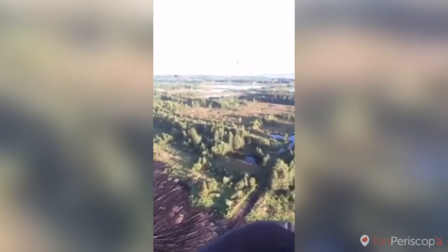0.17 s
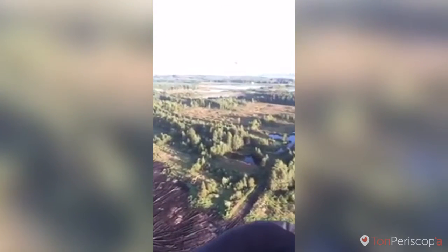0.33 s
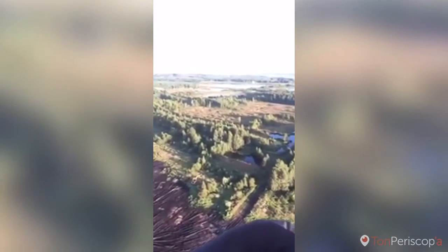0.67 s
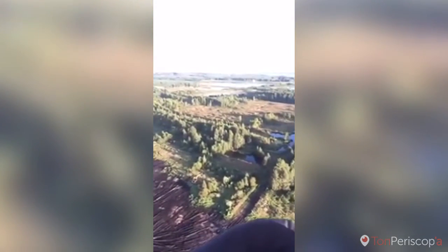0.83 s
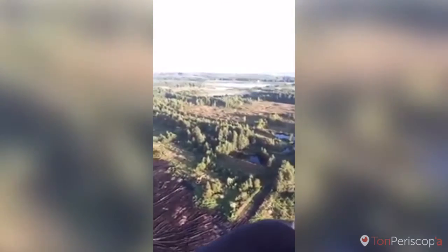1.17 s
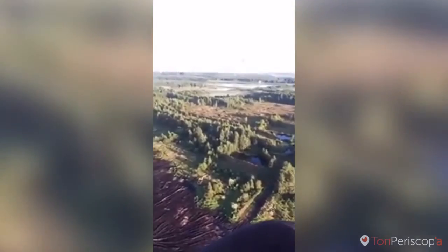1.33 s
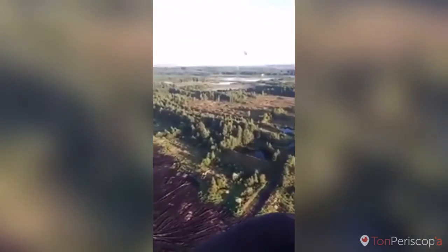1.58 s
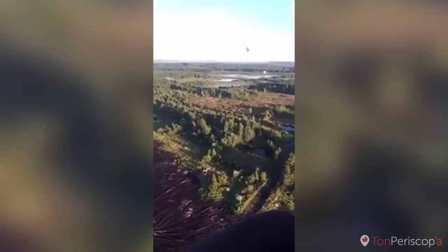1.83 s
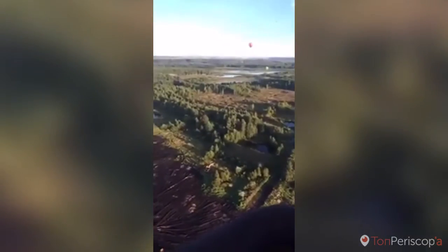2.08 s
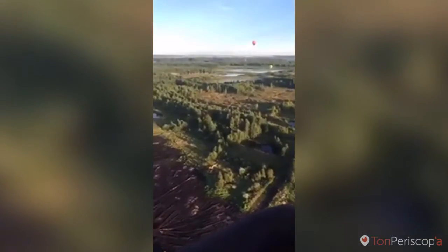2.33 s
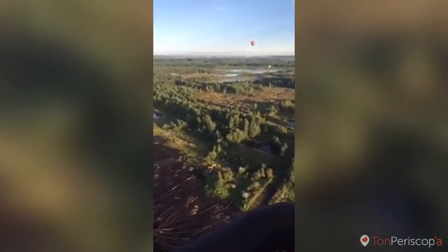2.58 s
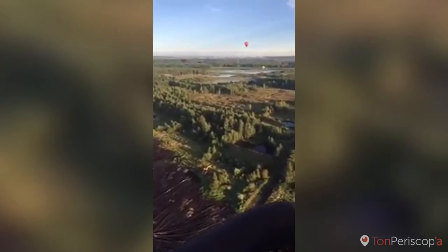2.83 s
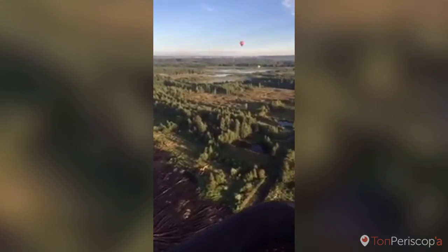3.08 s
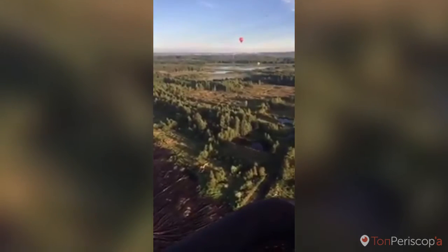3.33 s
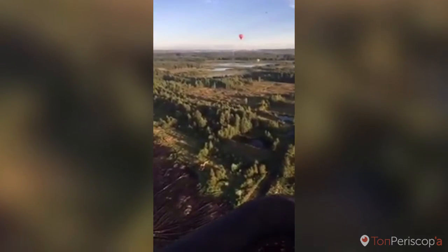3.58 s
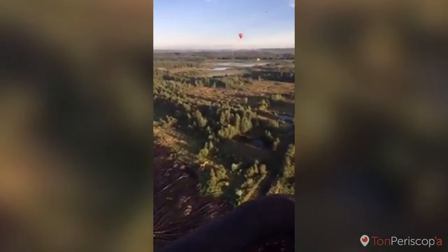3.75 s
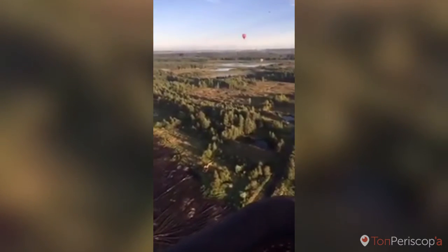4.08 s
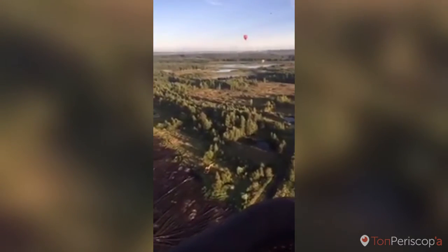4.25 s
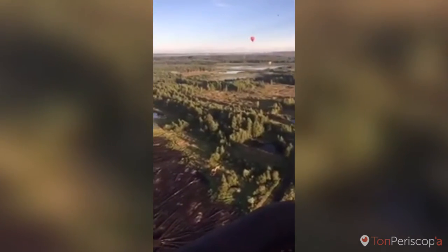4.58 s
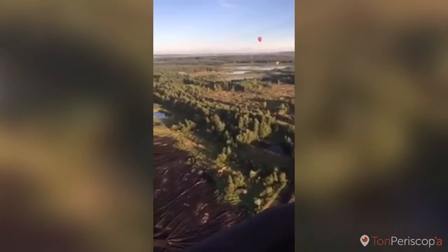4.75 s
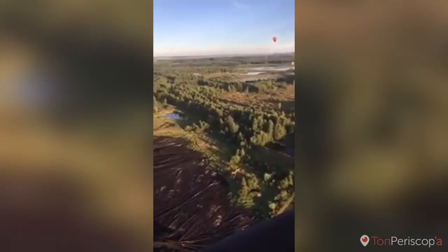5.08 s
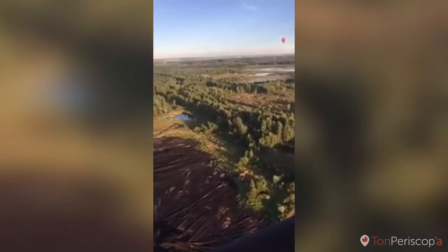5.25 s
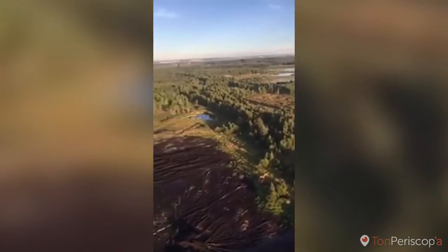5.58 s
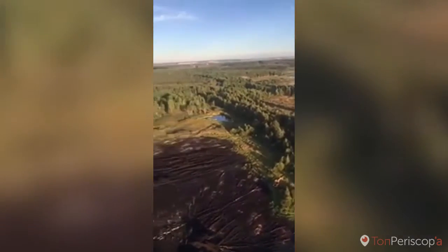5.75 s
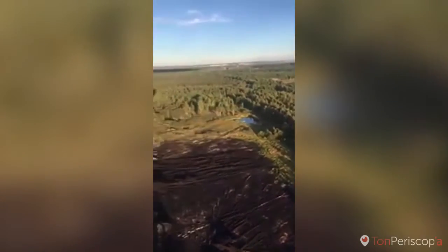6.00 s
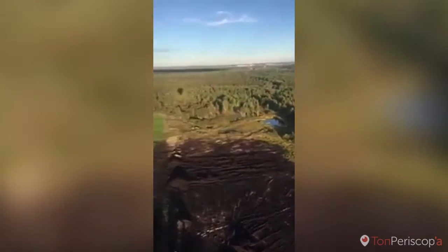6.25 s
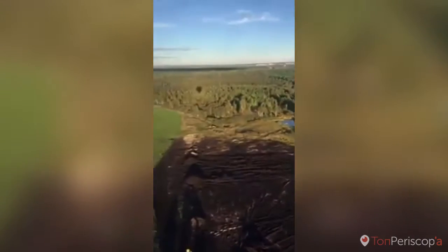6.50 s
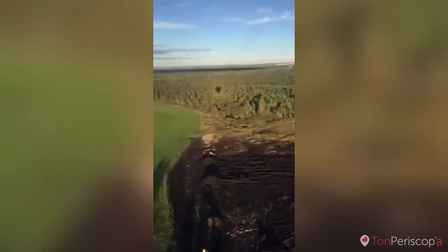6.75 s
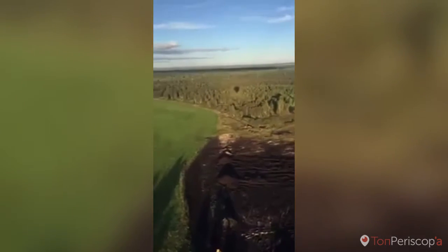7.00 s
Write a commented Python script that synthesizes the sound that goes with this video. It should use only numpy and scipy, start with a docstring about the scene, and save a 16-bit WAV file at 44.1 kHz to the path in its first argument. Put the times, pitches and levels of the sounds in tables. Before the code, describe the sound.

For the first five and a half seconds, a hot-air balloon's pilot flame rumbles softly and spits several times a second, in thin, irregular, fizzy ticks with a slight metallic colour. At about 0.4 seconds, fingers scuff the microphone and a metal fitting clacks with a short ring. A hand bumps the microphone with a dull thud at 1.4 seconds. At 5.5 seconds the gas burner lights with a sudden low whump and becomes far louder than anything before: a bright jet hiss over a throbbing, crackling roar and deep rumble. The blast eases after 6 seconds and dies away around 6.5 to 6.7. At about 6.8 seconds the burner opens again and roars to the end, just after 7 seconds. Everything is heard within arm's reach from the basket, in still open air.

```python
"""A hot-air balloon's propane burner lights with a whump, roars, dies away and is opened again.
Its turbulent jet hisses and its unsteady flame rumbles; both follow the flow through the valve and fade
as the line empties. Before it lights, the pilot flame rumbles softly and spits as drops flash to gas,
a metal fitting clacks and a hand bumps the microphone. All is heard from the basket, in still air."""
import sys
import numpy as np
from scipy import signal
from scipy.fft import rfft, irfft
from scipy.io import wavfile
from scipy.ndimage import uniform_filter1d

SR = 44100
rng = np.random.default_rng(int(sys.argv[2]) if len(sys.argv) > 2 else 0)


def generate_wav(sig):
    """Save sig (samples, or channels by samples) to the path in sys.argv[1] as 16-bit PCM at SR."""
    pcm = np.round(np.clip(np.atleast_2d(sig).T, -1, 1) * 32767).astype(np.int16)
    wavfile.write(sys.argv[1], SR, pcm)


N = 314854


def from_db(db):
    """Amplitude ratio of a level in decibels."""
    return 10 ** (np.asarray(db) / 20)


def rms_one(x):
    """Normalisation to unit power."""
    return x / np.sqrt(np.mean(x ** 2) + 1e-20)


def seconds():
    """The time of every sample."""
    return np.arange(N) / SR


def reflections(echo_db, count=30):
    """Interference: echoes between can, coil and frame carve a fine ripple into the spectrum."""
    paths = np.zeros(N)
    echoes = from_db(echo_db) * rng.choice([-1, 1], count) / np.sqrt(count)
    delays_s = rng.uniform(.002, .022, count)
    paths[(delays_s * SR).astype(int)] = echoes
    paths[0] = 1
    return rfft(paths)


def noise(spectrum, resonances=(), echo_db=-60):
    """Source and filter: broadband noise shaped by a spectrum, resonances and echoes; unit power."""
    hz = np.maximum(np.arange(N // 2 + 1) * SR / N, 1)
    knots, levels = np.transpose(spectrum)
    octaves_outside = np.abs(np.log2(hz / np.clip(hz, knots[0], knots[-1])))
    db = np.interp(np.log(hz), np.log(knots), levels) - 30 * octaves_outside
    for centre, width, lift in resonances:
        db = db + lift / (1 + (2 * (hz - centre) / width) ** 2)
    return rms_one(irfft(rfft(rng.standard_normal(N)) * from_db(db) * reflections(echo_db), N))


def flutter(rate_hz, spread):
    """Random modulation of unit power around one rate; spread is its width in log frequency."""
    hz = np.maximum(np.arange(N // 2 + 1) * SR / N, .01)
    band = np.exp(-(np.log(hz / rate_hz) / spread) ** 2)
    return rms_one(irfft(rfft(rng.standard_normal(N)) * band, N))


def evened(x, window_s):
    """Division by the running rms steadies the slow level of a noise and keeps its fast grain."""
    return x / np.sqrt(uniform_filter1d(x ** 2, int(window_s * SR)) + 1e-9)


def puffs(rows, rise_s):
    """Envelope of linear rise and exponential decay for bursts (time [s], level [dB], t60 [s])."""
    out = np.zeros(N)
    for start, db, t60 in rows:
        first = max(int(start * SR), 0)
        age = np.arange(min(int((rise_s + t60) * SR), N - first)) / SR
        decay_db = 60 * np.maximum(age - rise_s, 0) / t60
        out[first:first + len(age)] += np.minimum(age / rise_s, 1) * from_db(db - decay_db)
    return out


def struck(hits, modes):
    """Modal superposition: each impulse sets every mode ringing as a damped sinusoid."""
    impulses, out = np.zeros(N), np.zeros(N)
    for s, db in hits:
        impulses[int(s * SR)] = from_db(db)
    for k, (hz, mode_db, t60) in enumerate(modes):
        radius, angle = np.exp(-np.log(1000) / (t60 * SR)), 2 * np.pi * hz / SR
        feedback = [1, -2 * radius * np.cos(angle), radius ** 2]
        ring = signal.lfilter([0, np.sin(angle)], feedback, impulses + 1e-18)
        out += (-1) ** k * from_db(mode_db) * ring
    return out


def whistle(centre_hz=12300, width_hz=140, level_db=-24, swell_db=4):
    """Narrowband noise: the pilot's orifice sings a faint breathy note that comes and goes."""
    peak = signal.iirpeak(centre_hz, centre_hz / width_hz, fs=SR)
    note = rms_one(signal.lfilter(*peak, signal.lfilter(*peak, rng.standard_normal(N))))
    return from_db(level_db + swell_db * flutter(0.98, spread=0.66)) * note


VALVE_OPEN_S = 5.496  # the burner lights; from here the pilot's hiss is quieter and no sputter starts
# spectra of the pilot's flame and of its gas hiss: (frequency [Hz], relative level [dB])
PILOT_RUMBLE = [(15, -58), (25, -57), (41, -12), (65, -0.5), (134, -3.5), (156, -6.5), (216, -7),
                (303, -20), (343, -19), (500, -37.5), (650, -43), (1100, -120)]
PILOT_HISS = [(300, -8), (450, -1), (560, -1), (720, 4), (850, 1), (1020, 6.5), (1350, -5.5), (1880, 1),
              (2500, -10), (5800, -12.5), (7600, -24), (9100, -8), (10800, -24.5), (12400, -14),
              (15000, -23)]
# size of the pilot flame, heard in its rumble: (time [s], relative level [dB])
PILOT_SIZE = [(0.0, -48), (0.33, -51.5), (0.63, -53), (1.8, -57), (2.78, -52), (4.35, -56), (4.72, -53),
              (5.17, -54.5), (5.4, -55.5)]


def pilot_flame(tube, rumble_db=2.0, hiss_db=-62.5, flicker_db=1.8, waver_db=0.55, hiss_drop_db=-5.0):
    """Combustion noise: a small flame flickers; its thin hiss is heard quieter once the burner lights."""
    size_db = np.interp(seconds(), *np.transpose(PILOT_SIZE))
    waver = waver_db * flutter(14, spread=0.95)
    hiss_gain = from_db(hiss_db + waver + hiss_drop_db * (seconds() > VALVE_OPEN_S))
    rumble_gain = from_db(size_db + rumble_db + flicker_db * flutter(12.3, spread=0.67))
    rumble = rumble_gain * noise(PILOT_RUMBLE)
    return rumble + hiss_gain * (noise(PILOT_HISS, tube, echo_db=-9) + whistle())


def sputters(per_s=3.4, level_db=-47, spread_db=3, t60=0.23, count=40):
    """Jittered pulse train: envelope of the smallest drops, which come until the burner lights."""
    jitter, strength = rng.uniform(-0.83, 1, (count, 2)).T
    starts = (np.arange(count) + .5 + .5 * jitter) / per_s
    levels = level_db + spread_db * strength
    return puffs([(s, db, t60) for s, db in zip(starts, levels) if s < VALVE_OPEN_S], rise_s=0.0088)


# spits of the pilot jet: (time [s], relative level [dB], t60 of the middle band [s], dull share [dB])
SPITS = [(0.0064, -43, 0.16, -5), (0.1034, -44.5, 0.11, -8.5), (0.178, -46.5, 0.17, -8),
         (0.2239, -42, 0.1, -16), (0.2695, -46, 0.43, -6), (0.5377, -42.5, 0.09, -7),
         (0.6779, -39, 0.096, -18), (0.757, -38.5, 0.11, -10), (0.827, -37.5, 0.12, -9),
         (0.933, -43, 0.091, -8.5), (0.9766, -39, 0.092, -13), (1.002, -40.5, 0.15, -8.5),
         (1.076, -40.5, 0.27, -10), (1.2087, -38.5, 0.1, -17), (1.289, -44, 0.19, -12),
         (1.4128, -38.5, 0.16, -7.5), (1.493, -49, 0.12, -3), (1.5564, -38.5, 0.12, -13),
         (1.6858, -39.5, 0.23, -11.5), (1.8157, -39.5, 0.14, -18), (1.9576, -32.5, 0.14, -14),
         (2.1066, -41, 0.2, -9.5), (2.2534, -39, 0.14, -13), (2.4117, -40.5, 0.16, -9),
         (2.486, -51, 0.15, -12), (2.5177, -46.5, 0.3, -17), (2.6444, -41.5, 0.15, -15),
         (2.6833, -39, 0.15, -14), (2.7887, -43.5, 0.13, -11), (2.854, -46.5, 0.11, -6),
         (2.9038, -39, 0.21, -11.5), (3.035, -41, 0.1, -15), (3.155, -41, 0.11, -16),
         (3.1754, -39.5, 0.11, -9.5), (3.2755, -40, 0.16, -11), (3.3844, -45.5, 0.33, -10),
         (3.4936, -42.5, 0.11, -12), (3.6002, -44.5, 0.15, -17), (3.7363, -38, 0.19, -11),
         (3.86, -41.5, 0.082, -17), (4.0502, -36, 0.14, -12.5), (4.1405, -45, 0.11, -13),
         (4.3006, -40, 0.092, -15), (4.4098, -42, 0.19, -11.5), (4.5974, -40.5, 0.094, -17),
         (4.6576, -47, 0.16, -14), (4.7381, -41.5, 0.13, -22), (4.906, -39.5, 0.17, -17),
         (5.0454, -42.5, 0.077, -25), (5.111, -47, 0.12, -6), (5.1916, -42, 0.15, -17.5),
         (5.3273, -44, 0.2, -9), (5.441, -47, 0.43, -15)]
# spectra of a spit's three bands: (frequency [Hz], relative level [dB])
SPIT_DULL = [(1200, -13), (1650, -2), (2000, -0.5), (2400, -4), (2700, -1.5), (3100, -0.5), (3600, -3.5),
             (4300, -6), (5500, -35)]
SPIT_MIDDLE = [(3200, -25), (4200, -7.5), (5000, -5), (5700, 2), (6700, 0.5), (7400, -5), (8000, -16),
               (9500, -54)]
SPIT_TOP = [(6800, -15), (8200, -2), (9400, 2), (10500, -1), (11500, -5), (13000, -5), (15000, -10.5)]


def pilot_spits(tube, lead_s=0.0048, usual_db=-41, top_growth=0.072, fizz_db=1.64):
    """Flash evaporation: propane drops burst into gas; the dull band swells later and lingers."""
    s, db, t60, dull_share_db = np.transpose(SPITS)
    onset = s - lead_s
    weak = sputters()
    brighter_db = top_growth * (db - usual_db)  # a harder spit has more treble
    dull = puffs(zip(onset, db + dull_share_db - 6.5, t60 * 1.9), rise_s=0.01)
    middle = puffs(zip(onset, db - 13.5, t60), rise_s=0.0057)
    top = puffs(zip(onset, db - 13.5 + brighter_db, t60 * 0.78), rise_s=0.0078)
    bands = [(dull + from_db(-15.0) * weak) * noise(SPIT_DULL, tube, echo_db=4.0),
             (middle + from_db(-14.5) * weak) * noise(SPIT_MIDDLE, tube, echo_db=-2.5),
             (top + from_db(-21.0) * weak) * noise(SPIT_TOP, echo_db=1)]
    return sum(band * from_db(fizz_db * flutter(61, spread=1.3)) for band in bands)


# narrow resonances of the pilot's tube: (frequency [Hz], gain [dB])
TUBE_MODES = [(1690, 1.5), (1790, 8), (1920, 7), (2170, 11), (2380, 9.5), (2530, 7), (2990, 7), (3110, 6),
              (4220, 8), (4495, 9.5), (4800, 11.5), (5130, 8), (5400, 2), (5520, 8.5), (5800, 8.5),
              (6000, -7.5), (6330, 8.5), (6790, 7)]


def tube_ring(ring_db=-34.5, t60=0.11, scatter_db=3.5, max_delay_s=.012):
    """Modal excitation: each spit shakes the tube's modes in its own mix, so every tick has its colour."""
    s, db = np.transpose(SPITS)[:2]
    scatter = scatter_db * np.clip(rng.standard_normal((len(s), len(TUBE_MODES))), -2, 2)
    levels = db[:, None] + ring_db + scatter
    starts = s[:, None] + max_delay_s * rng.random(levels.shape)
    return sum(struck(zip(starts[:, k], levels[:, k]), [(hz, gain_db, t60)])
               for k, (hz, gain_db) in enumerate(TUBE_MODES))


# impact on the metal fitting: (time [s], level [dB])
CLACK = [(0.4222, -24)]
# modes of the fitting: (frequency [Hz], gain [dB], t60 [s])
FITTING_MODES = [(1300, -16, 0.064), (1980, -18, 0.35), (2120, 7.5, 0.016), (2290, 2.5, 0.025),
                 (2490, -21, 0.36), (3070, -6.5, 0.026), (3360, -3, 0.02), (3730, 3, 0.019),
                 (4400, -15, 0.089), (4791, -9, 0.1), (5400, -12, 0.088), (6770, -19, 0.046),
                 (8800, -8.5, 0.061), (10800, -33, .05)]


def fitting(crack_db=-14.0, crack_t60=0.076):
    """Impact of metal on metal: a broadband crack and the free vibration of the fitting."""
    s, db = CLACK[0]
    envelope = puffs([(s, db + crack_db, crack_t60)], rise_s=0.0023)
    crack = envelope * (noise(SPIT_MIDDLE, echo_db=-9) + noise(SPIT_TOP, echo_db=-11))
    return struck(CLACK, FITTING_MODES) + crack


# ringing of the frame after the clack and two spits: (time [s], level [dB], t60 [s])
FRAME_RINGS = [(0.4222, -37, 0.23), (1.960, -55, 0.23), (2.645, -42.5, 0.19)]
# spectrum of the frame's two clusters of modes: (frequency [Hz], relative level [dB])
FRAME_SPECTRUM = [(1300, -10), (1750, -3), (1950, -5), (2250, 2), (2600, -7), (3700, -10), (4400, -1),
                  (4750, -5), (5300, -15), (6500, -22)]


def frame(tube):
    """Modal overlap: many close modes of the burner frame blur into a short metallic tail."""
    return puffs(FRAME_RINGS, rise_s=0.0046) * noise(FRAME_SPECTRUM, tube)


# fingers rubbing the microphone's case: (time [s], level [dB], t60 [s])
RUBS = [(0.328, -39.5, 0.083), (0.345, -46, 0.14), (0.382, -42.5, 0.08), (0.408, -44.5, 0.12),
        (0.975, -52.5, 0.18), (1.002, -50.5, 0.055), (1.372, -48, .06), (1.382, -48, 0.037)]
# spectrum of the rubbing: (frequency [Hz], relative level [dB])
RUB_SPECTRUM = [(130, 6.5), (250, -4), (400, -3.5), (530, -13), (680, 3.5), (820, -13), (970, -2.5),
                (1200, -35), (1800, -35)]
# bump of the hand on the case: (time [s], level [dB])
BUMP = [(1.3932, -23.5)]
# damped modes of the case: (frequency [Hz], gain [dB], t60 [s])
CASE_MODES = [(140, -14, .03), (272, -22, 0.012), (400, 6.5, 0.0058), (595, 3, 0.0085), (880, -11, 0.012)]


def hand():
    """Structure-borne sound: friction and one bump on the microphone's case give dull scuffs and a thud."""
    return puffs(RUBS, rise_s=0.0025) * noise(RUB_SPECTRUM) + struck(BUMP, CASE_MODES)


# flares that run ahead of the fireball: (time [s], level [dB], t60 [s])
FLARES = [(5.478, -43, 0.25), (5.502, -13, 0.06)]


def flame_front():
    """Deflagration: gas catches at the pilot with a short broadband flare."""
    spectrum = [(150, 6.5), (300, -6), (520, -7), (750, -14.0), (2200, -28)]
    return puffs(FLARES, rise_s=0.013) * noise(spectrum)


def ignition(start_s=5.502, first_hz=182, last_hz=57, grow_s=0.0198, level_db=2.5, t60=0.056):
    """Monopole radiation: the fireball's pulsation slows as it grows, a whump of falling pitch."""
    age = np.maximum(seconds() - start_s, 0)
    hz = last_hz + (first_hz - last_hz) * np.exp(-(age / grow_s) ** 2)
    envelope = puffs([(start_s, level_db, t60)], rise_s=0.031)
    return envelope * np.sin(2 * np.pi * np.cumsum(hz * (age > 0)) / SR)


HOLD_S, SAG_DB_PER_S, DRAIN_S = 0.53, 20.5, 0.225  # pressure holds, then sags; the shut line drains
# pulls on the valve; each voice of the burner scales the surge and its time to crest:
# (opening time [s], rise time [s], closing time [s], base surge [dB], base time to crest [s])
BLASTS = [(5.494, 0.027, 6.441, 8.0, 0.063), (6.756, 0.074, 7.2, 4.5, 0.062)]


def valve_gain(level_db, steepness, surge_share, slowness, opening_curve=1.19):
    """Power law: a voice's gain is a power of the flow, times a pressure that surges, holds and sags."""
    out = np.zeros(N)
    for opens, rise, shuts, surge_db, crest_s in BLASTS:
        age = np.maximum(seconds() - opens, 0)
        opening = np.minimum(age / rise, 1) ** opening_curve
        flow = opening * np.clip(1 - (seconds() - shuts) / DRAIN_S, 0, 1)
        swell = age / (crest_s * slowness)
        swell_db = surge_share * surge_db * swell * np.exp(1 - swell)
        sag_db = SAG_DB_PER_S * np.maximum(age - HOLD_S, 0)
        out += flow ** steepness * from_db(level_db + swell_db - sag_db)
    return out


# resonances and notches of the burner can: (frequency [Hz], bandwidth [Hz], gain [dB])
CAN_RESONANCES = [(150, 73, -1), (239, 30, 6.5), (480, 17, 3), (566, 95, -2.5), (740, 99, 6),
                  (880, 42, -11), (943, 190, 4), (1360, 73, 4), (1440, 220, -2), (1670, 21, 3),
                  (2900, 25, 5.5), (4040, 23, 9), (6800, 39, -7), (7600, 510, -3), (10450, 300, -1)]
# spectrum of the gas jet: (frequency [Hz], relative level [dB])
JET_SPECTRUM = [(2120, 4.5), (3600, -1), (4280, -0.5), (4970, 2), (5670, 1.5), (6980, 1), (7690, -1),
                (9470, 2), (10500, -0.5), (14000, 0), (15000, -2.5)]


def gas_jet(treble_hz=9500, full_db=-32, dulling=0.67):
    """Turbulent jet noise: a slower jet hisses lower, so its treble fades first as the pressure drops."""
    gain = valve_gain(level_db=-32.5, steepness=1.53, surge_share=1.13, slowness=0.98)
    hiss = noise(JET_SPECTRUM, CAN_RESONANCES, echo_db=-18.5)
    treble = signal.sosfiltfilt(signal.butter(2, treble_hz, "high", fs=SR, output="sos"), hiss)
    brightness = np.minimum(gain / from_db(full_db), 1) ** dulling
    return gain * (hiss - (1 - brightness) * treble)


# billows of the flame: (time [s], rise of the rumble [dB], half-width [s])
BILLOWS = [(5.982, 3, 0.019), (6.184, 5.5, 0.018), (6.246, 6, 0.022), (6.888, 7, 0.046)]
# spectra of the flame's rumble and roar and of the nozzle's rasp: (frequency [Hz], relative level [dB])
RUMBLE_SPECTRUM = [(15, -48), (25, -31.5), (60, -2.5), (113, -5), (146, 2), (205, -9), (249, -7.5),
                   (321, -10), (362, -8.5), (429, -19), (450, -14), (580, -47), (990, -120)]
ROAR_SPECTRUM = [(380, -2), (460, 3), (520, 9.5), (600, 2.5), (720, 5), (880, 0), (990, -1.5), (1130, 1.5),
                 (1300, -10.5), (1500, -4.5), (1800, -8.5), (2300, -40)]
RASP_SPECTRUM = [(1550, -20), (1850, 1.5), (2150, 4.5), (2450, 2), (2700, -5.5), (3150, -4), (3600, -16.5),
                 (4200, -12)]


def burner(rumble_throb_db=1.58, roar_throb_db=1.0, crackle_db=-0.9, billow_roar_share=0.19):
    """Turbulent combustion: the flame throbs and crackles over the jet, and murmurs on between blasts."""
    billow = sum(lift_db * np.exp(-((seconds() - s) / width) ** 2) for s, lift_db, width in BILLOWS)
    throb = flutter(34.5, spread=0.24)
    crackle = crackle_db * flutter(220, spread=0.87)
    murmur = from_db(-63) * (seconds() > VALVE_OPEN_S)
    rumble = valve_gain(level_db=-16.0, steepness=0.78, surge_share=0.085, slowness=2.0, opening_curve=2.2)
    rumble = (rumble + from_db(13) * murmur) * from_db(billow + rumble_throb_db * throb)
    roar = valve_gain(level_db=-26.0, steepness=1.25, surge_share=0.69, slowness=1.39)
    roar = (roar + murmur) * from_db(billow_roar_share * billow + roar_throb_db * throb + crackle)
    rasp = valve_gain(level_db=-35.5, steepness=0.7, surge_share=0.72, slowness=0.74) * from_db(crackle)
    return (rumble * evened(noise(RUMBLE_SPECTRUM, CAN_RESONANCES), window_s=.05)
            + roar * noise(ROAR_SPECTRUM, CAN_RESONANCES)
            + rasp * noise(RASP_SPECTRUM, CAN_RESONANCES, echo_db=-11.0)
            + gas_jet())


def scene(tube_width_hz=45):
    """Superposition in a free field: every source is within arm's reach, with open sky all round."""
    tube = [(hz, tube_width_hz, gain_db) for hz, gain_db in TUBE_MODES]
    pilot = pilot_flame(tube) + pilot_spits(tube) + tube_ring()
    handling = fitting() + frame(tube) + hand()
    return (pilot + handling + flame_front() + ignition() + burner())[None]


def record(dry, low_hz=24, high_hz=15000, ceiling=.74):
    """Band limiting and saturation: the small microphone loses deep bass and top, and rounds off peaks."""
    thinned = signal.sosfilt(signal.butter(2, low_hz, "high", fs=SR, output="sos"), dry)
    rounded = thinned / (1 + (thinned / ceiling) ** 6) ** (1 / 6)
    return signal.sosfilt(signal.ellip(12, .1, 80, high_hz, fs=SR, output="sos"), rounded)


dry = scene()
out = record(dry)
generate_wav(out)
```